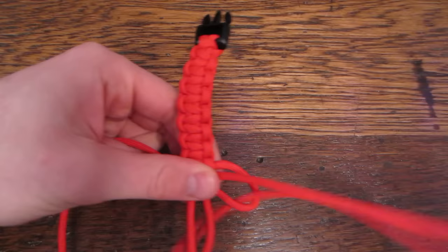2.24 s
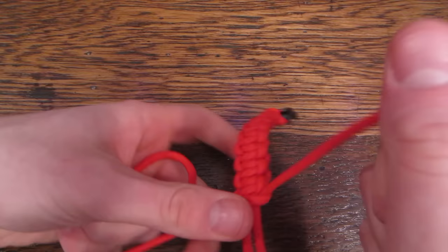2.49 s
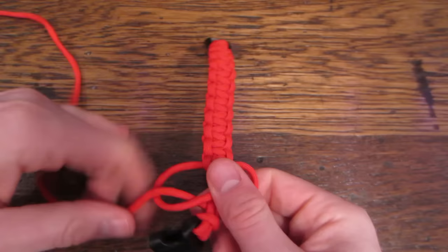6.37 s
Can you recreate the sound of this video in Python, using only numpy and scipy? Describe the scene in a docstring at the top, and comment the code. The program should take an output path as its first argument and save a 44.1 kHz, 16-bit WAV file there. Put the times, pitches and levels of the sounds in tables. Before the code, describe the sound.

Nylon cord is braided by hand, catching and releasing with small dry snaps, ticks and short scratchy swishes over a wooden table.

```python
"""Nylon cord braided by two hands, close to the microphone, just above a wooden table in a quiet room.
The cord catches on fingers and knots and lets go with dry snaps; single strands tick, and the weave
swishes in tiny slips as it slides, with a rare squeak. Fingertips rub the sheath and tap the wood,
and the hands bump the table top. The room adds a faint tail; electronics hiss and whine underneath."""
import sys
import numpy as np
from scipy import signal
from scipy.fft import rfft, irfft
from scipy.io import wavfile

SR = 44100
rng = np.random.default_rng(int(sys.argv[2]) if len(sys.argv) > 2 else 0)


def dump_mix(stems):
    """Bounce the given channels to the path in sys.argv[1] as a 16-bit WAV at rate SR."""
    frames = np.atleast_2d(stems).T  # one column per channel
    limited = np.clip(frames, -1, 1)  # hard clip at full scale
    pcm = np.round(limited * 32767).astype(np.int16)
    wavfile.write(sys.argv[1], SR, pcm)


N = 353241
TIME = np.arange(N) / SR
CUTOFF_HZ = 16200

# the cord catches, lets go and slides to rest: t/s, level/dB, scrape t60/s, brightness/dB
SNAPS = [(0.0358, -18, 0.055, 5.5), (0.461, -16, 0.056, 2.5), (0.522, -13, 0.026, 8),
         (0.5854, -6.5, 0.015, 0), (0.6645, -4.5, 0.012, 10.5), (0.7636, -20.5, 0.011, 10),
         (0.7745, -15, 0.014, 9), (1.0087, -16, 0.018, 0.5), (1.1108, -23.5, 0.041, 3.5),
         (1.2523, -18, 0.087, 4), (1.278, -22, 0.026, 11), (1.6839, -7, 0.033, 6),
         (1.7135, -11.5, 0.035, 7.5), (1.7736, -11, 0.064, 1), (1.8265, -10, .029, 6),
         (1.9218, -21, 0.037, 5), (2.2076, -20, 0.056, 3.5), (2.3171, -25, 0.17, 1),
         (2.3471, -5, 0.0046, 10), (2.357, -20.5, 0.044, 2), (2.406, -12, 0.017, 1.5),
         (2.471, -12.5, 0.053, 3.5), (2.9728, -13.5, 0.049, 4.5), (3.002, -7.5, 0.03, 6),
         (3.052, -11, 0.02, 14), (3.2466, -18.5, 0.019, 7), (3.6497, -22, 0.0089, -1.5),
         (3.7444, -4, 0.02, 6), (3.7712, -13.5, 0.031, 3), (3.8008, -10, 0.038, 4.5),
         (4.1742, -14, 0.12, 4.5), (4.2044, -10.5, 0.033, 7.5), (4.2546, -13, 0.034, 7.5),
         (4.2738, -17, 0.021, 2), (4.3068, -10.5, 0.043, 7), (4.736, -21, 0.034, 3), (4.804, -8, 0.026, 7),
         (4.823, -11, 0.044, 13), (4.9149, -11.5, 0.023, 2), (5.1373, -17, 0.021, 1),
         (5.1958, -9.5, 0.029, 2), (5.2841, -13.5, 0.038, 3), (5.326, -17, 0.0079, 3),
         (5.4698, -15.5, 0.058, 1.5), (5.5063, -17, 0.042, 4.5), (5.853, -23, 0.12, 4.5),
         (5.877, -17, 0.012, 4), (5.909, -20.5, 0.022, -2), (5.94, -26.5, 0.031, -8),
         (6.032, -12.5, 0.013, 10), (6.2355, -6, 0.016, 5.5), (6.3553, -13.5, 0.01, 0.5),
         (6.5597, -20, 0.023, 1), (6.584, -21, 0.089, 2), (7.1941, -16, 0.014, -2.5),
         (7.2329, -15.5, 0.033, -0.5), (7.3083, -23, 0.067, 4), (7.63, -20, 0.021, -6.5),
         (7.6768, -11, 0.017, 0.5), (7.8157, -20, 0.028, -4.5), (7.938, -17, 0.029, -1)]
# each pull draws the cord through a knot or the fingers: t/s, length/s, level/dB
PULLS = [(0.037, 0.021, -42), (0.079, 0.018, -45), (0.652, 0.035, -45.5), (0.732, 0.019, -47),
         (0.764, 0.053, -48.5), (1.07, 0.03, -49.5), (1.163, 0.045, -48), (1.221, 0.024, -45.5),
         (1.305, 0.019, -44), (1.853, 0.038, -43), (2.44, 0.032, -48), (2.519, 0.029, -46.5),
         (3.03, 0.055, -48.5), (3.12, 0.036, -51.5), (3.175, 0.022, -44), (3.216, 0.029, -44.5),
         (3.733, 0.0087, -53), (3.824, 0.034, -45.5), (4.302, 0.05, -43.5), (4.749, 0.016, -45.5),
         (4.822, 0.031, -41.5), (4.861, 0.04, -46), (5.288, 0.074, -50), (5.432, 0.063, -50),
         (5.962, 0.036, -45), (6.038, 0.053, -46.5), (6.259, 0.079, -51.5), (6.382, 0.078, -53.5),
         (6.48, 0.064, -48), (7.204, 0.013, -41), (7.336, 0.044, -44), (7.85, 0.031, -48)]
# broad spectrum of the sliding weave: f/Hz, level/dB
SLIDE_COLOUR = [(60, -8), (200, -5.5), (650, -12), (1400, 1), (3000, 0.5), (6500, 0.5), (10000, 1),
                (15500, -2), (16500, -44)]
# peaks and hollows on the short path from the hands to the microphone: f/Hz, width/Hz, gain/dB
MIC_PATH = [(505, 42, 7.5), (798, 40, 9), (1008, 69, 4.5), (1487, 68, 8), (2415, 64, 7.5), (2896, 127, 7.5),
            (3188, 224, 9), (3750, 110, -7.5), (4080, 143, 7.5), (4810, 65, -2.5), (5050, 140, 6),
            (5190, 77, -9.5), (5370, 200, 5.5), (6430, 94, 6.5), (6910, 190, 6.5), (7350, 240, 6),
            (7920, 330, 6.5), (8340, 140, 5.5), (11390, 210, 4)]
# the silky band in which the ribs of the sliding sheath sing: f/Hz, width/Hz, gain/dB
SHEEN = [(5640, 770, 5)]


def from_db(db):
    return 10 ** (np.asarray(db) / 20)


def rms_one(x):
    return x / np.sqrt(np.mean(x ** 2) + 1e-20)


def dying(t, t60):
    """Falls by 60 dB in t60 seconds."""
    return np.exp(-np.log(1000) * t / max(t60, 1e-3))


def add(out, s, sound):
    """Mixes a sound in at s seconds, or at the start if s is negative."""
    start = int(np.clip(round(s * SR), 0, N - 1))
    out[start:start + len(sound)] += sound[:N - start]


def butter(x, order, hz, kind="low"):
    return signal.sosfilt(signal.butter(order, hz, kind, fs=SR, output="sos"), x)


def drift(rate_hz):
    """Random wander of rms 1."""
    return rms_one(butter(rng.standard_normal(N + SR), 2, rate_hz)[SR:])


def colour(x, spectrum, resonances=(), size=8192):
    """Minimum-phase filter of unit power gain: a broad spectrum with peaks and hollows on it."""
    hz = np.maximum(np.fft.rfftfreq(size, 1 / SR), 1)
    points, levels = np.transpose(spectrum)
    db = np.interp(np.log(hz), np.log(points), levels)
    for centre, width, peak_db in resonances:
        db += peak_db / (1 + (2 * (hz - centre) / width) ** 2)
    cepstrum = irfft(np.log(from_db(db)))[:size // 2]
    cepstrum[1:] *= 2
    response = np.exp(rfft(cepstrum, size))
    response /= np.sqrt(np.mean(np.abs(response) ** 2 * (hz < CUTOFF_HZ)))
    return signal.fftconvolve(x, irfft(response)[:size // 2])[:N]


def fibres(per_s, spread_db, judder_db, judder_hz):
    """Friction of a braided sheath: tiny uneven slips that swell as the strands pass; rms 1."""
    slips = (rng.random(N) < per_s / SR) * rng.choice([-1, 1], N)
    sizes = from_db(spread_db * np.minimum(rng.exponential(1, N), 4))
    return rms_one(slips * sizes * from_db(judder_db * drift(judder_hz)))


def electronics(hiss_db):
    """The noise floor: steady hiss and a few thin, slightly wavering tones."""
    # spectrum of the hiss: f/Hz, relative level/dB
    hiss_colour = [(15, -58), (25, -21), (170, -9), (427, -12.5), (463, -13), (560, -10.5), (6050, -18),
                   (7310, -20), (16000, -26.5)]
    # tones of the electrical whine: f/Hz, rms level/dB
    tones = [(473.7, -76), (958.2, -77.5), (1922, -75.5), (7074, -78.5), (9900, -80), (10550, -80)]
    hiss = from_db(hiss_db) * colour(rng.standard_normal(N), hiss_colour)
    whine = sum(from_db(db) * np.sqrt(2) * np.sin(2 * np.pi * hz * TIME + drift(10.7))
                for hz, db in tones)
    return hiss + whine


def regrips(grip_db, reach_s, scuff_db, scuff_hz, band_hz):
    """Fingertips rub the sheath: in uneven scuffs around each pull, smoothly on the way to a new hold."""
    # the fingertips brush along to a new hold: t/s, length/s, level/dB
    brushes = [(0.0, 0.033, -49.5), (1.963, 0.11, -56.5), (2.578, 0.097, -56.5), (3.31, 0.15, -55.5),
               (4.624, 0.12, -62), (7.067, 0.11, -59)]
    touch = np.zeros(N)
    for s, length, _ in PULLS:
        add(touch, s - reach_s, np.hanning(int((length + 2 * reach_s) * SR)))
    touch *= from_db(grip_db + scuff_db * np.tanh(drift(scuff_hz)))  # finger pressure swings
    for s, length, level_db in brushes:
        add(touch, s, from_db(level_db) * np.hanning(int(length * SR)))
    grain = fibres(per_s=4000, spread_db=2.5, judder_db=8.5, judder_hz=129)
    rub = colour(grain, SLIDE_COLOUR, MIC_PATH + SHEEN)
    return touch * butter(rub, 1, band_hz, "band")


def fidgets(per_s, level_db, spread_db, t60):
    """The fingers shift their hold: faint crackles at random moments around the snaps."""
    busy = np.zeros(N)
    for s, *_ in SNAPS:
        add(busy, s - 1 / 6, np.hanning(SR // 3))
    chance = per_s * busy / busy.mean() / SR
    shifts = (rng.random(N) < chance) * from_db(level_db - spread_db * rng.random(N))
    grip = signal.fftconvolve(shifts, dying(TIME[:SR // 8], t60))[:N]
    return colour(grip * rng.standard_normal(N), SLIDE_COLOUR, MIC_PATH)


def snaps(slips_db, slips_s, flurry_db, flurry_t60, uneven_db, scrape_db, slip_count=4):
    """The caught cord lets go: a sharp crack, a flurry of fibres, a dying scrape and a few after-slips."""
    out, t = np.zeros(N), TIME[:SR // 8]
    weave = np.pad(fibres(per_s=6000, spread_db=0.5, judder_db=1.0, judder_hz=372), (0, len(t)))
    for s, level_db, scrape_t60, bright_db in SNAPS:
        flurry = rng.standard_normal(len(t)) * dying(t, flurry_t60)
        flurry *= from_db(uneven_db * rng.standard_normal(len(t)))
        snap = from_db(flurry_db) * flurry / np.linalg.norm(flurry)
        snap += from_db(scrape_db) * weave[int(s * SR):][:len(t)] * dying(t, scrape_t60)
        snap[0] += np.sqrt(0.5)  # the crack
        # neighbouring strands give way at widening intervals: each snap has its own hollow colour
        turns = (np.arange(slip_count) + 1 + rng.random(slip_count)) / (slip_count + 1)
        delays = (slips_s * turns ** 2 * SR).astype(int)
        snap[delays] += from_db(slips_db) * rng.choice([-1, 1], slip_count)
        # a hard strand edge gives a bright snap, a soft fingertip a dull one
        tilt = [(3040, -bright_db / 2), (11500, bright_db / 2)]
        add(out, s, from_db(level_db) * colour(snap, tilt))
    return out


def cord_speed(take_up_s=0.0033, tighten_db=0.5, stop_s=0.0054):
    """Speed as a gain: each pull takes up the slack, grows a little as the knot closes, and stops."""
    speed = np.zeros(N)
    for s, length, level_db in PULLS:
        t = TIME[:int(length * SR)]
        edges = np.clip(np.minimum(t / take_up_s, (t[-1] - t) / stop_s), 0, 1)
        add(speed, s, edges * from_db(level_db + tighten_db * (t / t[-1] - 2)))
    return speed


def pulls(uneven_db, uneven_hz, fast_db):
    """Friction wavers as the ridges of the weave pass; the faster the cord runs, the more treble."""
    speed = cord_speed() * from_db(uneven_db * drift(uneven_hz))
    grain = fibres(per_s=16000, spread_db=0.6, judder_db=2.0, judder_hz=253)
    friction = colour(grain, SLIDE_COLOUR, MIC_PATH + SHEEN)
    body = butter(friction, 1, hz=5500)
    treble = (friction - body) * speed / from_db(fast_db)
    return speed * (body + treble)


def bumps(swell_s, table_hz, table_t60, table_db, uneven_db, uneven_hz):
    """A soft, uneven push swells and fades over a few cycles; the table's lowest mode hums on briefly."""
    # the hands bump the table top: t/s, level/dB, f/Hz
    pushes = [(0.042, -55, 171), (1.111, -49, 180), (1.189, -50.5, 172), (2.419, -50, 145),
              (2.513, -45, 121), (2.601, -46.5, 131), (2.704, -55.5, 108), (2.774, -48, 186)]
    out, t = np.zeros(N), TIME[:SR // 4]
    swell = (t / swell_s * np.exp(1 - t / swell_s)) ** 2
    ring = np.sin(2 * np.pi * table_hz * t) * dying(t, table_t60) * (1 - np.exp(-t / swell_s))
    for s, level_db, hz in pushes:
        push = swell * np.sin(2 * np.pi * hz * t)
        add(out, s, from_db(level_db) * (push + from_db(table_db) * ring))
    return out * from_db(uneven_db * drift(uneven_hz))


def ticks(scatter_db, t60):
    """A tiny crack with no scrape, and its brief scatter of reflections between the fingers."""
    # single strands flick over each other: t/s, level/dB
    flicks = [(0.1467, -23), (0.205, -23), (0.563, -18), (0.696, -19), (0.7151, -25), (1.1043, -23),
              (1.3007, -20), (1.717, -13), (1.755, -20), (1.8196, -25), (2.279, -24.5), (3.0078, -11),
              (3.399, -30), (3.7189, -19.5), (4.1709, -18), (4.8535, -19), (5.151, -20.5), (5.953, -20.5),
              (7.1864, -26), (7.6185, -26), (7.7784, -24), (7.829, -24), (7.9293, -18), (7.9454, -17.5)]
    out, t = np.zeros(N), TIME[:SR // 32]
    for s, level_db in flicks:
        scatter = rng.standard_normal(len(t)) * dying(t, t60)
        tick = from_db(scatter_db) * scatter / np.linalg.norm(scatter)
        tick[0] += 1
        add(out, s, from_db(level_db) * tick / np.linalg.norm(tick))
    return out


def taps(t60, band_ratio, rattle_db, wood_db, wood_t60):
    """A dull knock and faint rattle, in a band set by the contact's softness; the wood rings on, lower."""
    # fingers and cord ends tap the wood and each other: t/s, level/dB, centre f/Hz
    contacts = [(0.473, -45, 263), (1.2473, -36.5, 1600), (1.694, -44, 395), (2.333, -46, 356),
                (2.5402, -38, 1550), (3.054, -32, 990), (3.648, -49, 470), (3.779, -37, 1710),
                (3.840, -42.5, 810), (4.927, -39.5, 1170), (6.109, -40, 1290), (6.511, -35, 1730),
                (7.328, -39.5, 1220), (7.776, -45.5, 524)]
    out, t = np.zeros(N), TIME[:SR // 8]
    decay = dying(t, t60)
    for s, level_db, hz in contacts:
        force = from_db(rattle_db) * rng.standard_normal(len(t)) * decay
        force[0] += 1
        band_hz = np.array([hz / band_ratio, hz * band_ratio])
        contact = butter(force, 2, band_hz, "band")
        wood = butter(rng.standard_normal(len(t)), 2, band_hz / 2, "band") * dying(t, wood_t60)
        knock = colour(contact + from_db(wood_db) * wood, [(hz, 0)], MIC_PATH)
        add(out, s, from_db(level_db) * knock * np.linalg.norm(decay) / np.linalg.norm(knock))
    return out


def squeaks(wobble):
    """Stick and slip lock into a broken, unsteady tone that sinks as the cord slows."""
    # nylon squeaks under the skin: t/s, length/s, first f/Hz, last f/Hz, level/dB
    glides = [(3.887, 0.014, 4550, 4540, -46.5), (5.381, 0.072, 1977, 1374, -50.5)]
    out, waver, grip = np.zeros(N), drift(280), np.abs(drift(120))
    for s, length, first_hz, last_hz, level_db in glides:
        progress = np.linspace(0, 1, int(length * SR))
        hz = last_hz + (first_hz - last_hz) * (1 - progress) ** 2
        hz *= 1 + wobble * waver[int(s * SR):][:len(hz)]  # the uneven weave roughens the pitch
        tone = np.sin(2 * np.pi * np.cumsum(hz) / SR)
        add(out, s, from_db(level_db) * np.sin(np.pi * progress) * tone)
    return out * grip


def room(x, t60, wall_hz, gap_s=0.004):
    """The darker tail that comes back from the walls of a small furnished room."""
    t = TIME[:SR // 2]
    tail = rng.standard_normal(len(t)) * dying(t, t60) * (t > gap_s)
    tail = butter(tail, 1, wall_hz)
    return signal.fftconvolve(x, tail / np.linalg.norm(tail))[:N]


def scene():
    """One microphone close to the hands: cord and table up front, the room well behind."""
    # broad spectrum of the snaps and ticks: f/Hz, level/dB
    crack_colour = [(60, -24), (200, -14.5), (650, -8.5), (1100, 0.5), (3000, 4.5), (7500, 4), (10000, 3.5),
                    (15000, 1), (16500, -13)]
    releases = snaps(slips_db=-22, slips_s=0.002, flurry_db=-8.5, flurry_t60=0.038,
                     uneven_db=5, scrape_db=-20)
    releases += ticks(scatter_db=-1.5, t60=0.026)
    cracks = colour(releases, crack_colour, MIC_PATH)
    slides = pulls(uneven_db=1.87, uneven_hz=43.3, fast_db=-45) + squeaks(wobble=0.044)
    fingers = fidgets(per_s=55, level_db=-52, spread_db=5.5, t60=0.007)
    fingers += regrips(grip_db=-63.5, reach_s=0.11, scuff_db=9, scuff_hz=29.8, band_hz=(1760, 9000))
    table = taps(t60=0.036, band_ratio=2.08, rattle_db=-19.5, wood_db=-34.5, wood_t60=0.11)
    table += bumps(swell_s=0.0081, table_hz=178.2, table_t60=0.24, table_db=-4,
                   uneven_db=3.2, uneven_hz=104)
    near = cracks + slides + fingers + table
    tail = from_db(-20.5) * room(near, t60=0.53, wall_hz=3400)
    return (near + tail + electronics(hiss_db=-60))[None]


def record(dry):
    """A steep low-pass cuts the highest treble."""
    return signal.sosfilt(signal.ellip(10, 0.3, 70, CUTOFF_HZ, fs=SR, output="sos"), dry)


dry = scene()
out = record(dry)
dump_mix(out)
```